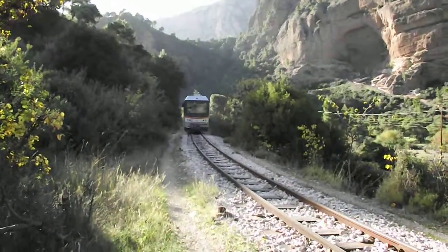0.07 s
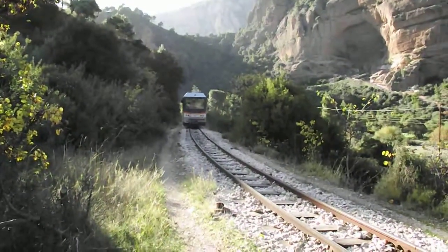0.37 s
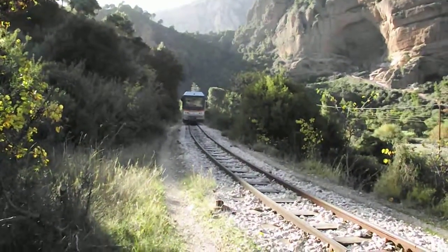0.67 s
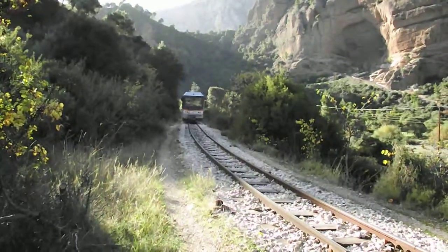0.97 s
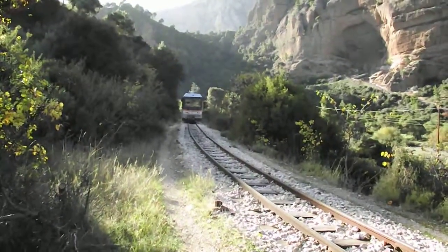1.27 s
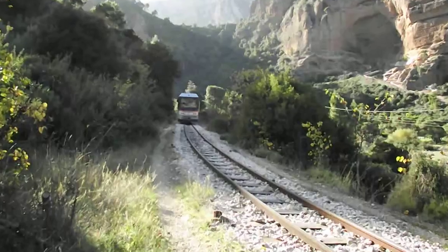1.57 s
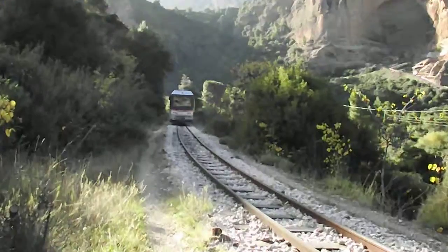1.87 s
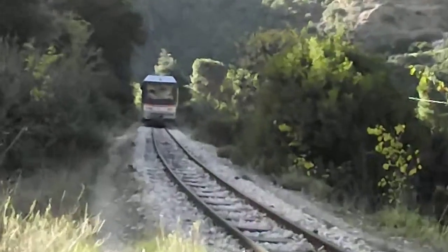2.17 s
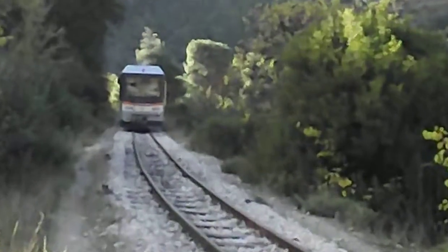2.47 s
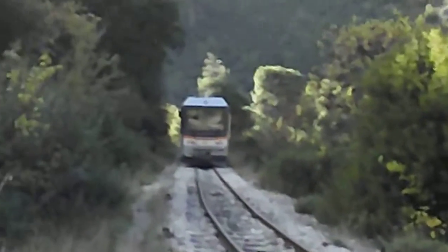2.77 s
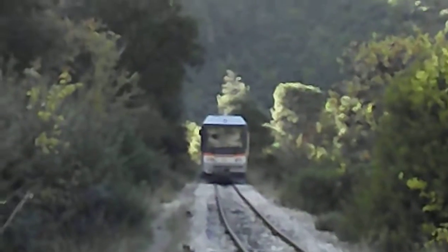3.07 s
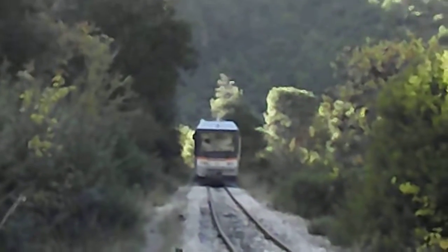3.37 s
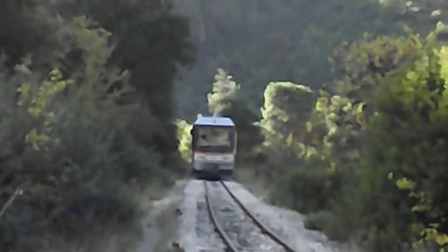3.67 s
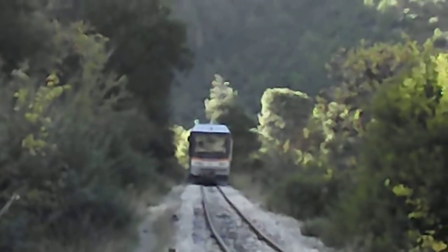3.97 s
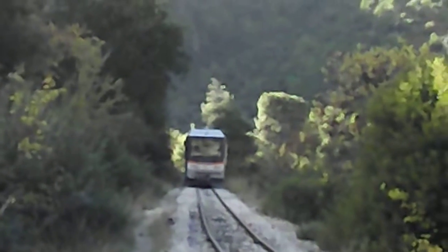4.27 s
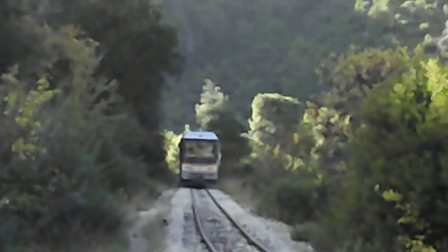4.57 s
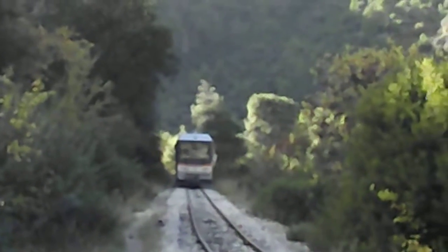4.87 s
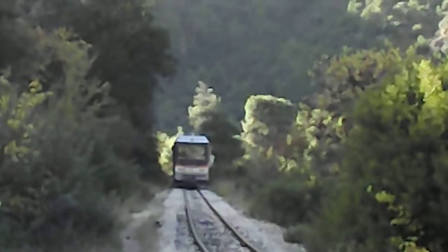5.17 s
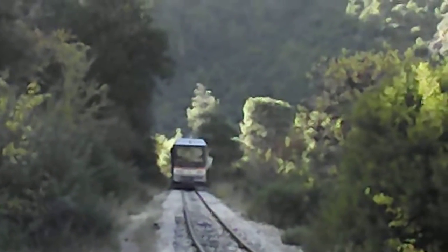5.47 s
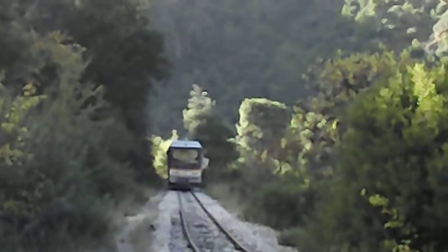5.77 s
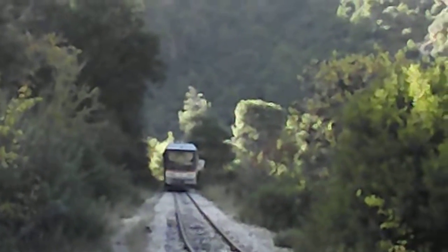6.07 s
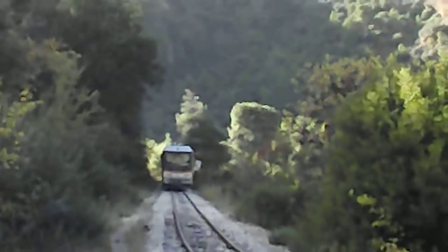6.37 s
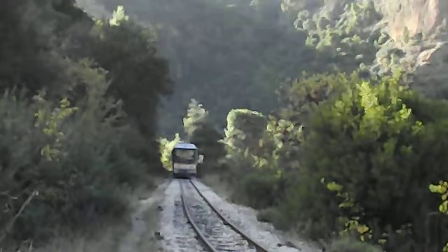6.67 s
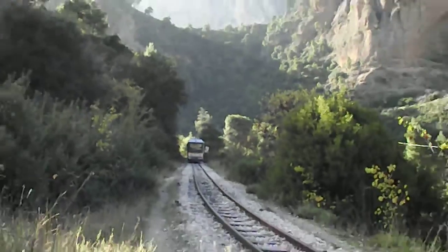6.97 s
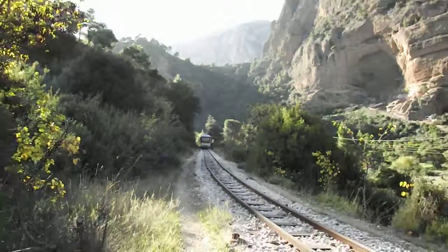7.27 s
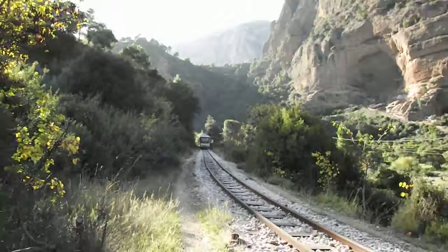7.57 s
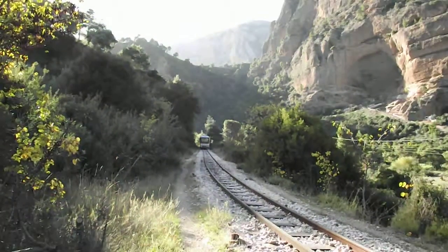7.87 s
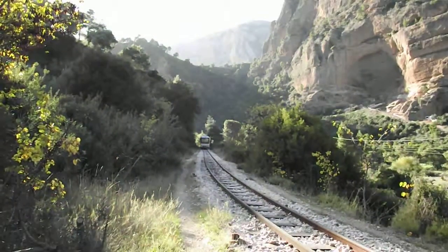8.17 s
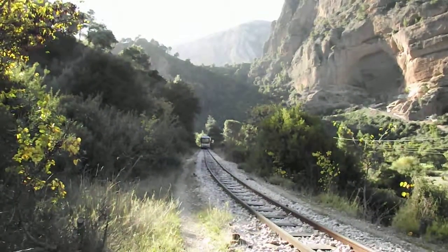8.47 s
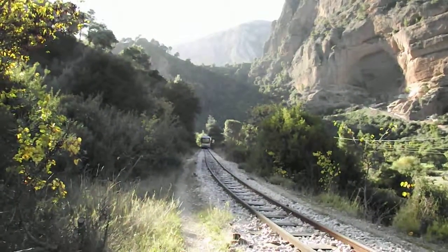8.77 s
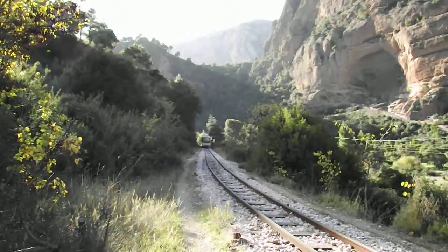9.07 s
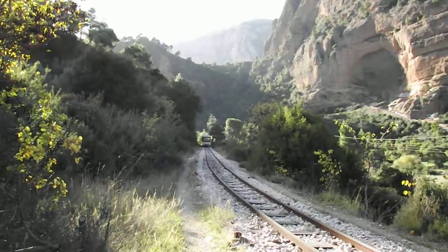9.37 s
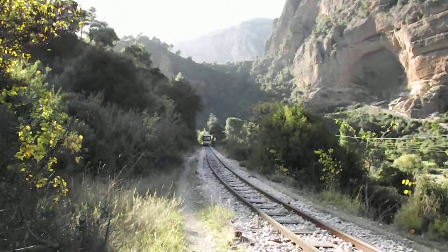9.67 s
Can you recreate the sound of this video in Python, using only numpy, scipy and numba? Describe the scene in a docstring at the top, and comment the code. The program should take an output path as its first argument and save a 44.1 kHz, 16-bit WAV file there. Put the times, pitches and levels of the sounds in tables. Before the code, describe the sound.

From the trackside in a gorge, a departing railcar gives a deep rumble, hissing rails and pairs of clacks over the joints, all growing gradually fainter. Soft wind gusts, rustling leaves and scattered small ticks are close by. A single loud, hard knock hits the microphone's casing, with a short quiet creak after it. Then the rails ring thinly and the low diesel drone swells twice as the car recedes.

```python
"""A small diesel railcar rolls away up a gorge, heard from about 40 m by a microphone beside the track.
Its body and engine rumble, and the rails carry a steely hiss and the paired clacks of axles crossing
joints, all fading with distance. Breeze rustles the bushes and buffets the microphone, small things
tick, and right at the microphone one sharp knock on the camera casing is followed by a short creak."""
import sys
import numpy as np
from scipy import signal
from scipy.fft import rfft, irfft
from scipy.io import wavfile
from scipy.ndimage import uniform_filter1d
from numba import njit

SR = 44100
rng = np.random.default_rng(int(sys.argv[2]) if len(sys.argv) > 2 else 0)


def int16_out(signal):
    """Quantize to a 16-bit WAV file."""
    q = np.round(np.clip(np.atleast_2d(signal).T, -1, 1) * 32767)
    wavfile.write(sys.argv[1], SR, q.astype(np.int16))


N = 432621
TIME = np.arange(N) / SR
BIN_HZ = np.maximum(np.fft.rfftfreq(2 ** 19, 1 / SR), 1)


def undb(db):
    """Decibels to gain."""
    return 10 ** (np.asarray(db) / 20)


def unit(x):
    """Scale to rms 1."""
    return x / np.sqrt(np.mean(x ** 2))


def curves(table):
    """Each column of a timed table, sample by sample."""
    times, *columns = np.transpose(table)
    return [np.interp(TIME, times, column) for column in columns]


def wander(rate_hz):
    """Smooth random drift with a spread near 1."""
    hold = max(int(SR / rate_hz), 1)
    steps = np.repeat(rng.standard_normal(N // hold + 1), hold)
    return 1.3 * uniform_filter1d(uniform_filter1d(steps, hold), hold)[:N]


def swell(peak_s, half_length_s):
    """Smooth rise and fall around peak_s."""
    return np.exp(-((TIME - peak_s) / half_length_s) ** 2)


def blow(start_s, rise_s, decay_s):
    """Envelope of one blow: quick rise, exponential fall."""
    age = np.clip(TIME - start_s, 0, 50 * decay_s)
    return (1 - np.exp(-age / rise_s)) * np.exp(-age / decay_s)


def spectrum(points):
    """Gain over frequency through (frequency_hz, gain_db) points."""
    hz, db = np.transpose(points)
    return undb(np.interp(np.log(BIN_HZ), np.log(hz), db))


def resonances(modes):
    """Gain over frequency of steep-sided (pitch_hz, width_hz, gain_db) modes."""
    gains = (undb(db) / (1 + ((BIN_HZ - hz ** 2 / BIN_HZ) / width) ** 2) for hz, width, db in modes)
    return np.sqrt(sum(gain ** 2 for gain in gains))


def colour(x, gain):
    """Causal filter with the given gain over frequency; keeps the power of white noise."""
    cepstrum = irfft(np.log(unit(gain) + 1e-6))
    size = len(cepstrum)
    cepstrum[1:size // 2] *= 2
    cepstrum[size // 2 + 1:] = 0
    return irfft(rfft(x, size) * np.exp(rfft(cepstrum)))[:N]


@njit
def sweep(x, hz, width_hz):
    """Band-pass whose centre moves."""
    out = np.empty(len(x))
    band_state, low_state = 0., 0.
    for i in range(len(x)):
        tuning = np.tan(np.pi * hz[i] / SR)
        damping = width_hz / hz[i]
        band = (band_state + tuning * (x[i] - low_state)) / (1 + tuning * (tuning + damping))
        band_state = 2 * band - band_state
        low_state += 2 * tuning * band
        out[i] = damping * band
    return out


def grit(spread_db):
    """Dense tiny impacts of uneven size, each a quarter of a millisecond long."""
    sizes = np.repeat(rng.standard_normal(N // 11 + 1), 11)[:N]
    return unit(rng.standard_normal(N) * undb(spread_db * sizes))


def loose_tone(hz, width_hz):
    """A loosely held resonance: a tone whose strength and phase wander."""
    phase = 2 * np.pi * hz * TIME
    return unit(wander(2 * width_hz) * np.sin(phase) + wander(2 * width_hz) * np.cos(phase))


def doublings(time_s, start_m=39.6, speed_m_s=5.5):
    """How often the car's distance from the microphone has doubled; each doubling costs a loss_db."""
    return np.log2(1 + speed_m_s * time_s / start_m)


# The microphone's own hiss: frequency_hz, gain_db
HISS_SPECTRUM = [(100, -22), (6000, 4.5), (9000, 1.5), (10200, 4), (11000, -2), (11800, 3), (12600, -1),
                 (15700, -2)]
def electronics(hiss_db=-63, whine_db=-74.5, whine_hz=15721, tick_db=-58, tick_every_s=0.03388):
    """The camera's own hiss, a thin whine and a very faint regular ticking."""
    hiss = undb(hiss_db) * colour(rng.standard_normal(N), spectrum(HISS_SPECTRUM))
    whine = undb(whine_db) * np.sin(2 * np.pi * whine_hz * TIME)
    age = (TIME - 0.0235) % tick_every_s
    ticking = colour(rng.standard_normal(N) * np.exp(-age / 0.0024), resonances([(11500, 4600, 0)]))
    return hiss + whine + undb(tick_db) * ticking


# Breeze in the trackside bushes: time_s, level_db
BREEZE_LEVELS = [(0, -37.5), (2.5, -42.5), (5.5, -41.5), (7.6, -40.5), (8.7, -42.5), (9.81, -43.5)]
# Rustle of their leaves: frequency_hz, gain_db
LEAF_SPECTRUM = [(100, -5.5), (330, 1), (450, 0), (650, -1), (950, 0.5), (1300, 0.5), (1650, 2), (2200, 3),
                 (3000, -12), (3800, -16), (4300, -10), (5500, -43), (8000, -47)]
def breeze(gust_db=0.42):
    """Leaves rustle softly all around the microphone."""
    level_db, = curves(BREEZE_LEVELS)
    return colour(grit(spread_db=1.5), spectrum(LEAF_SPECTRUM)) * undb(level_db + gust_db * wander(9))


# Wind on the microphone: time_s, level_db
WIND_LEVELS = [(0, -33), (0.6, -41), (1.2, -28.5), (2.8, -31), (3.4, -45), (4.8, -41), (5.3, -40.5),
               (9.81, -40.5)]
def wind(pitch_hz=35, width_hz=35):
    """Soft gusts buffet the microphone."""
    level_db, = curves(WIND_LEVELS)
    return undb(level_db) * colour(rng.standard_normal(N), resonances([(pitch_hz, width_hz, 0)]))


# Whistling far off: start_s, end_s, start_hz, end_hz, level_db
FAR_TONES = [(4.203, 7.6, 924, 926, -57.5), (8.2, 9.103, 1065, 1005, -52.5)]
def far_whistles(waver_db=3.5):
    """Two faint tones swell and fade in the distance; the second sinks a little."""
    out = 0
    for start_s, end_s, start_hz, end_hz, db in FAR_TONES:
        progress = np.interp(TIME, [start_s, end_s], [0, 1])
        hz = start_hz + (end_hz - start_hz) * progress
        envelope = undb(db + waver_db * wander(14)) * np.sin(np.pi * progress)
        out += envelope * np.sin(2 * np.pi * np.cumsum(hz) / SR)
    return out


# Small things ticking near the microphone: start_s, level_db, pitch_hz, width_hz, decay_s
NEAR_TICKS = [(0.269, -19, 2380, 260, 0.007), (0.8988, -31, 8950, 2600, .001),
              (0.8993, -24, 5220, 750, 0.0015), (3.490, -30.5, 1400, 300, .008),
              (4.3505, -26.5, 3100, 1000, 0.0027), (6.159, -22, 1420, 500, 0.0037),
              (7.975, -37, 5000, 1500, 0.0018), (7.974, -29, 1550, 800, 0.0063),
              (9.569, -30, 1950, 1200, 0.0054)]
def ticks():
    """Tiny dry snaps, each with one broad resonance."""
    out = 0
    for start_s, db, hz, width_hz, decay_s in NEAR_TICKS:
        snap = rng.standard_normal(N) * blow(start_s, 0.0002, decay_s)
        out += undb(db) * colour(snap, resonances([(hz, width_hz, 0)]))
    return out


# Camera casing, rung by the knock: pitch_hz, width_hz, gain_db
KNOCK_MODES = [(1420, 84, 5), (1760, 330, -6.5), (1107, 220, -14), (2400, 710, -10.5), (3050, 790, -19),
               (5640, 860, -28), (230, 150, -23.5)]
def knock(start_s=3.5268, push_db=37, scrape_db=1.3, tail_db=-17):
    """A hard, briefly scraping knock on the hand-damped casing overloads the microphone."""
    push = undb(push_db) * np.maximum(1 - np.abs(TIME - start_s) * SR, 0)
    ring = colour(push, resonances(KNOCK_MODES)) * blow(start_s, 0.0015, 0.0025)
    friction = rng.standard_normal(N) * swell(start_s + 0.0027, 0.0025)
    scrape = colour(friction, resonances([(2150, 2700, 6), (5800, 1000, -4)]))
    # the main mode outlasts the others
    main_hz = KNOCK_MODES[0][0]
    tail = np.sin(2 * np.pi * main_hz * (TIME - start_s)) * blow(start_s, 0.0016, 0.012)
    return 2 * ring + undb(scrape_db) * scrape + undb(tail_db) * tail


# Slipping casing, right at the microphone: time_s, slip_rate_hz, level_db, resonance_hz
CREAK_PATH = [(3.53, 96.2, -81, 6200), (3.59, 104.9, -59, 6160), (3.65, 115.8, -53, 6100),
              (3.70, 123.3, -48, 5860), (3.735, 129.5, -43, 4600), (3.78, 133, -44, 4370),
              (3.805, 138, -44, 4400), (3.9, 138, -78, 4400)]
# Casing, rung by the slips: pitch_hz, width_hz, gain_db
CREAK_MODES = [(1393, 110, 6), (1820, 220, -1), (6130, 350, -25), (7200, 630, -45), (9780, 390, -22)]
def creak(body_db=-38, friction_db=-4, width_hz=1300.):
    """A quickening train of slips rings the casing while a bright resonance slides down."""
    rate_hz, level_db, hz = curves(CREAK_PATH)
    phase = np.cumsum(rate_hz) / SR % 1
    slips = unit(1. * (np.diff(phase, prepend=0) < 0))
    friction = unit(rng.standard_normal(N) * np.exp(-phase / 0.35))
    drive = 0.5 * slips + undb(friction_db) * friction
    bright = unit(sweep(sweep(drive, hz, width_hz), hz, width_hz))
    body = swell(3.67, 0.11) * colour(slips, resonances(CREAK_MODES))
    return undb(level_db) * bright + undb(body_db) * body


# Flares of bright sizzle: peak_s, half_length_s, level_db; the first two come from the flanges in the curve,
# the last is a bright ring lingering just after the creak
SIZZLE_FLARES = [(0.533, 0.028, -55), (1.29, 0.1, -62), (3.84, 0.13, -64)]
# Resonances of the sizzle: pitch_hz, width_hz, gain_db
FLANGE_MODES = [(6380, 650, 1.5), (8450, 3000, -12)]
def flanges(start_db=-61.5, loss_db=16.5):
    """A thin sizzle flares now and then and dies as the car leaves the curve."""
    flares = sum(undb(db) * swell(s, half_length) for s, half_length, db in SIZZLE_FLARES)
    fading = undb(start_db - loss_db * doublings(TIME))
    return colour(grit(spread_db=1), resonances(FLANGE_MODES)) * (fading + flares)


# Swells of ringing in the rail: peak_s, half_length_s, level_db
RAIL_RINGS = [(4.9, 0.9, -42), (6.297, 0.55, -50)]
def rail_ringing(pitch_hz=3279, width_hz=14):
    """The rail's purest mode rings out as the car rolls on."""
    envelope = sum(undb(db) * swell(s, half_length) for s, half_length, db in RAIL_RINGS)
    return loose_tone(pitch_hz, width_hz) * envelope


# Resonances of the rolling wheels: pitch_hz, width_hz, gain_db
ROLLING_MODES = [(611, 215, -1), (770, 72, -2)]
def wheels(start_db=-41, loss_db=14.5, flutter_db=2.6):
    """Wheels and sleepers drone hollowly while the car is near."""
    drone = colour(grit(spread_db=3.5), resonances(ROLLING_MODES))
    return drone * undb(start_db - loss_db * doublings(TIME) + flutter_db * wander(20))


RAIL_LOSS_DB = 7.5
# Rough spots between the joints: start_s, strength_db, thump_over_rumble_db
ROUGH_SPOTS = [(1.085, -27, 2), (1.166, -22.5, -20), (1.263, -18, -14), (1.287, -20.5, -20),
               (6.365, -22, -17), (8.275, -24, -20), (8.328, -20, -10), (8.589, -23, -10)]
# Rail joints, each crossed by a leading and a trailing axle:
# trail_s, lead_by_s, lead_strength_db, trail_strength_db, thump_over_rumble_db
RAIL_JOINTS = [(0.505, 0.23, -18, -13, -18), (2.801, 0.24, -17.5, -8.5, 0), (5.1168, 0.24, -15.5, -8.5, -6),
               (7.372, 0.231, -17.5, -11.5, -14), (9.82, 0.252, -22, -12, 2)]
def wheel_blows(jolt_decay_s=0.031, clack_decay_s=0.026):
    """Every blow of a wheel, weakened by distance: start_s, strength_db, decay_s, thump_db."""
    hits = [(s, db, jolt_decay_s, thump) for s, db, thump in ROUGH_SPOTS]
    for s, lead_by_s, lead_db, trail_db, thump in RAIL_JOINTS:
        hits += [(s - lead_by_s, lead_db, clack_decay_s, thump), (s, trail_db, clack_decay_s, thump)]
    return [(s, db - RAIL_LOSS_DB * doublings(s), decay, thump) for s, db, decay, thump in hits]


# Flanges leaning on the rail in the curve: peak_s, half_length_s, hiss_rise_db
FLANGE_LEANS = [(1.29, 0.05, 2.5), (1.45, 0.52, 2.1), (3.2, 0.18, 2), (4.047, 0.66, 4)]
# Resonances of the rails: pitch_hz, width_hz, gain_db
RAIL_MODES = [(564, 193, -13), (1480, 850, -16), (2370, 350, -9), (2668, 296, -2), (3017, 400, -0.5),
              (3279, 30, 4), (3335, 357, -3.5), (3980, 390, -14.5), (4470, 460, -20.5), (4910, 430, -24.5),
              (6020, 220, -36), (7800, 2200, -39.5)]
# Dull body of a wheel blow: frequency_hz, gain_db
CLANK_SPECTRUM = [(100, -9), (250, 0.5), (430, 4.5), (620, 3.5), (900, -2), (1300, -4), (2200, 0),
                  (3600, -15), (4700, -23), (5700, -32), (6600, -28), (10000, -44), (15000, -56)]
def rails(start_db=-31.5, flutter_db=1.4, blow_gain_db=-6.5, clank_db=-9, sing_db=-9, air_hz=8000):
    """Rough treads and wheel blows ring the steel; each blow strikes, rattles and rebounds once."""
    lean_db = sum(db * swell(s, half_length) for s, half_length, db in FLANGE_LEANS)
    rolling_db = start_db - RAIL_LOSS_DB * doublings(TIME) + lean_db
    rolling = grit(spread_db=1) * undb(rolling_db + flutter_db * wander(28))
    blows, tails = 0, 0
    for s, db, decay_s, _ in wheel_blows():
        strike = 1.24 * blow(s, 0.0018, 0.0056)
        rattle = blow(s, 0.0046, decay_s)
        rebound = 0.27 * blow(s + 0.021, 0.0024, decay_s)
        blows += undb(db + blow_gain_db) * (strike + rattle + rebound)
        tails += undb(db + blow_gain_db + sing_db) * blow(s, 0.034, 0.082)
    # the air takes the top off on the way to the microphone
    air = 1 / (1 + (BIN_HZ / air_hz) ** 4)
    steel = colour(rolling + blows * grit(spread_db=4), resonances(RAIL_MODES) * air)
    # a lightly damped rail mode sings on after each blow
    singing = colour(tails * rng.standard_normal(N), resonances([(3394, 100, 0)]))
    clank = colour(blows * grit(spread_db=4), spectrum(CLANK_SPECTRUM))
    return steel + singing + undb(clank_db) * clank


# The diesel, heard down the gorge: time_s, firing_hz, level_db
ENGINE_PATH = [(0, 69, -42), (3.5, 69, -37), (4.4, 68.5, -36.5), (4.9, 68, -29), (5.6, 68, -39.5),
               (7.1, 67.5, -31.5), (7.8, 68, -37), (9.81, 68, -55)]
def engine(waver=0.011, flutter_db=2, overtone_db=-17):
    """Low firing drone, wavering on its way between the cliffs."""
    hz, level_db = curves(ENGINE_PATH)
    phase = 2 * np.pi * np.cumsum(hz * (1 + waver * wander(12))) / SR
    drone = np.sin(phase) + undb(overtone_db) * np.sin(2 * phase)
    return unit(drone) * undb(level_db + flutter_db * wander(8.4))


# Booms of the swaying body: peak_s, half_length_s, pitch_hz, level_db
PANEL_BOOMS = [(0.144, 0.02, 74.7, -17), (0.627, 0.04, 170, -25), (0.812, 0.016, 90, -21),
               (1.616, 0.22, 69.7, -26), (3.815, 0.012, 85, -23), (3.868, 0.0096, 100, -21),
               (4.15, 0.12, 168, -30.5), (7.032, 0.06, 85.1, -29), (7.323, 0.018, 105.6, -26),
               (8.323, 0.08, 165, -37), (9.564, 0.072, 165, -37)]
def panel_booms(width_hz=22):
    """Floor and side panels boom briefly as the car sways."""
    return sum(undb(db) * swell(s, half_length) * loose_tone(hz, width_hz)
               for s, half_length, hz, db in PANEL_BOOMS)


# The car's body from about 40 m: frequency_hz, gain_db
NEAR_SPECTRUM = [(10, -7.5), (25, -22.5), (52, -3.5), (70, -3), (105, -3), (122, -8), (180, -9),
                 (230, -21.5), (320, -29.5), (450, -38), (900, -73)]
# The same from about 95 m: frequency_hz, gain_db
FAR_SPECTRUM = [(10, -24), (25, -15), (50, -2), (70, 2.5), (105, 1), (122, -2.5), (170, -10), (215, -26.5),
                (300, -29), (450, -39), (900, -65)]
def body_rumble(start_db=-22.2, loss_db=8.2, throb_db=1.3):
    """The body booms on its wheels and thumps at each blow, losing its upper bass with distance."""
    far = TIME / TIME[-1]
    shake = rng.standard_normal(N)
    boom = (1 - far) * colour(shake, spectrum(NEAR_SPECTRUM))
    boom += far * colour(shake, spectrum(FAR_SPECTRUM))
    thumps = sum(undb(thump_db) * blow(s, 0.0085, 0.038) for s, _, _, thump_db in wheel_blows())
    level_db = start_db - loss_db * doublings(TIME) + throb_db * wander(18)
    return unit(boom) * (1 + thumps) * undb(level_db)


def scene():
    """Railcar, gorge and the small sounds close by, at one trackside microphone."""
    railcar = body_rumble() + panel_booms() + engine() + wheels() + rails() + rail_ringing() + flanges()
    return (railcar + breeze() + wind() + far_whistles() + ticks() + knock() + creak())[None]


def record(dry):
    """The camera adds its own faint noise, clips at full scale and cuts the top above 15.9 kHz."""
    low_pass = signal.ellip(10, 0.1, 70, 15900, fs=SR, output="sos")
    return signal.sosfilt(low_pass, np.clip(dry + electronics(), -1, 1))


dry = scene()
out = record(dry)
int16_out(out)
```